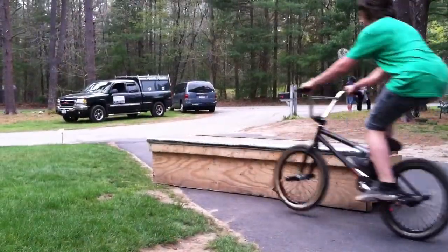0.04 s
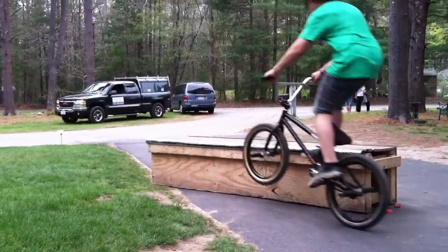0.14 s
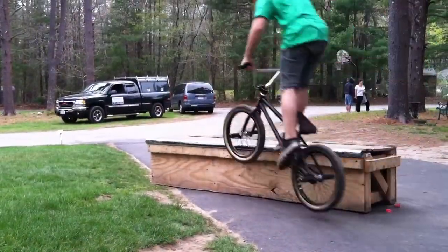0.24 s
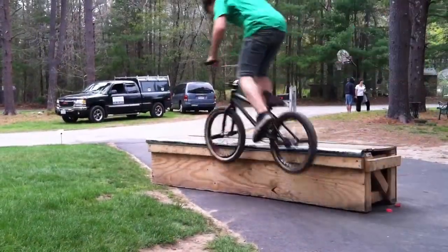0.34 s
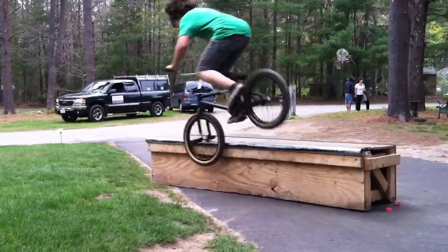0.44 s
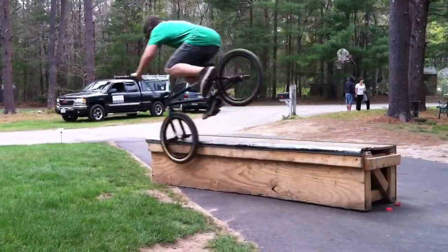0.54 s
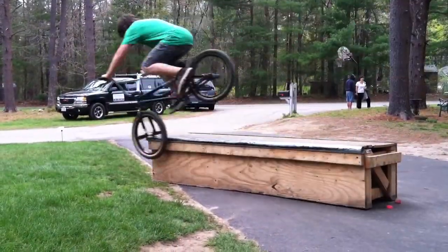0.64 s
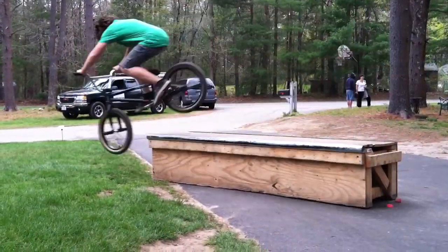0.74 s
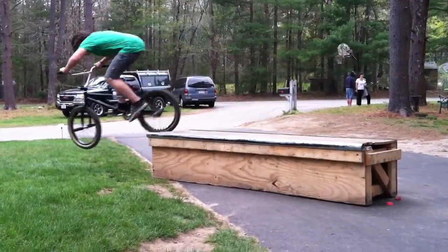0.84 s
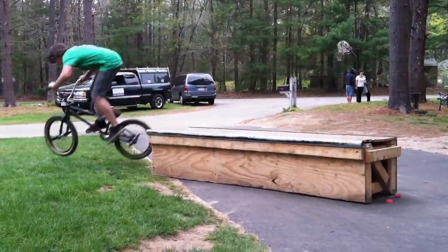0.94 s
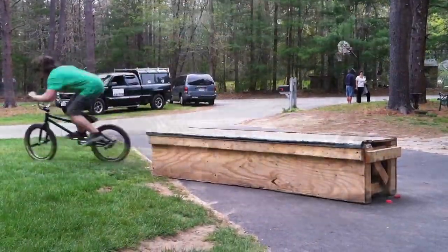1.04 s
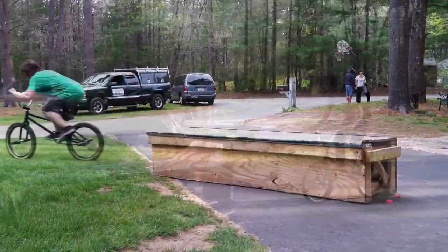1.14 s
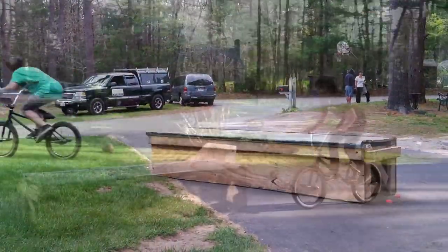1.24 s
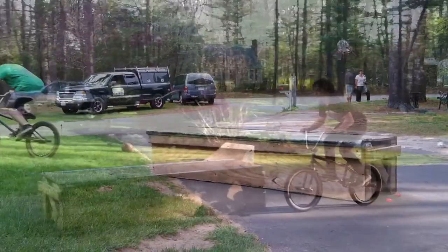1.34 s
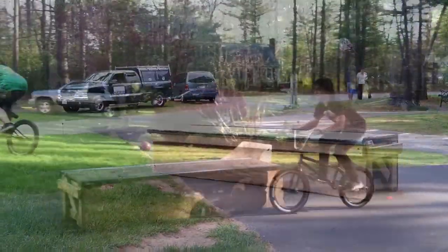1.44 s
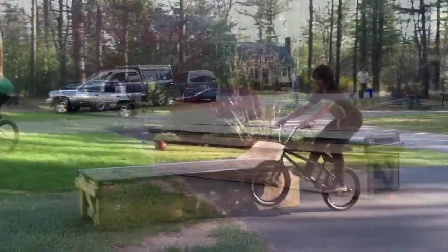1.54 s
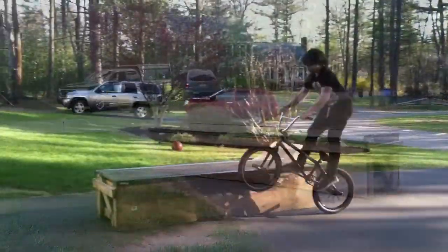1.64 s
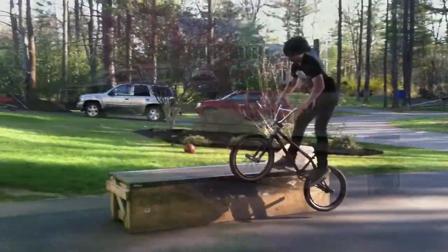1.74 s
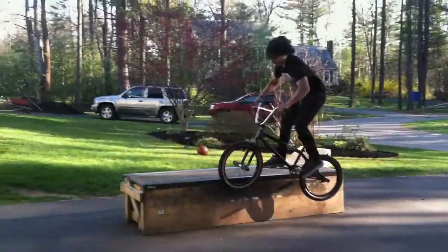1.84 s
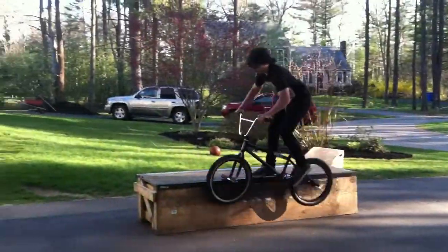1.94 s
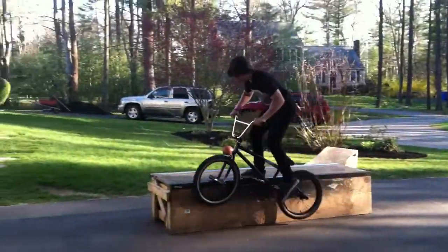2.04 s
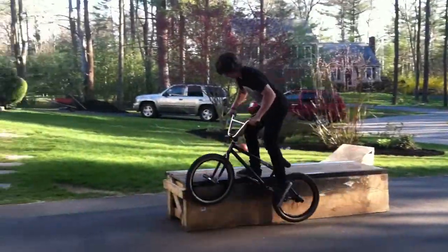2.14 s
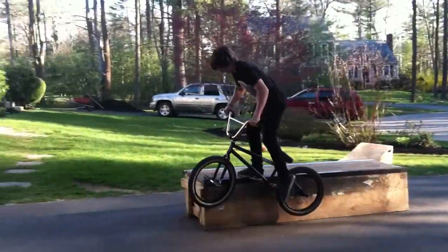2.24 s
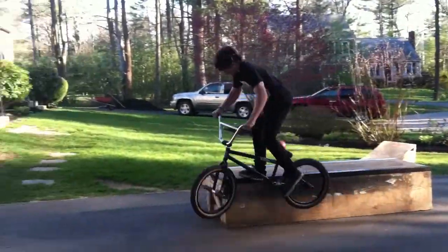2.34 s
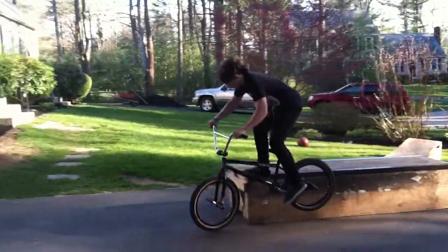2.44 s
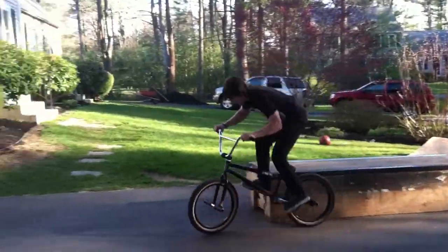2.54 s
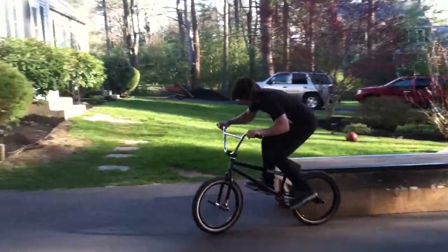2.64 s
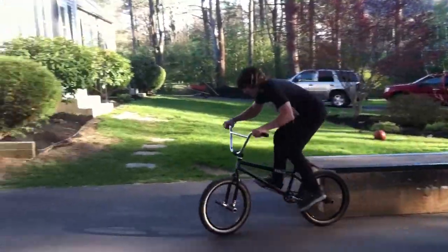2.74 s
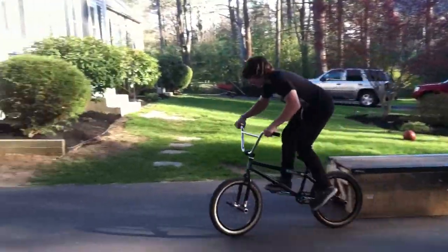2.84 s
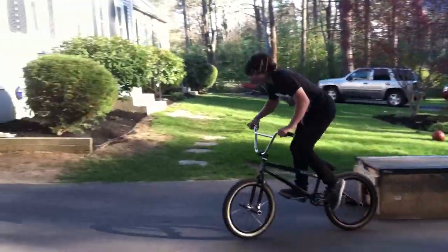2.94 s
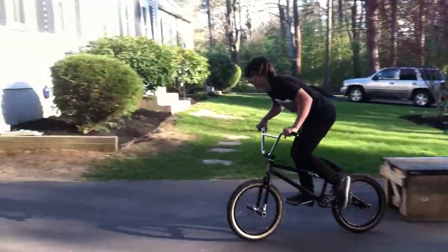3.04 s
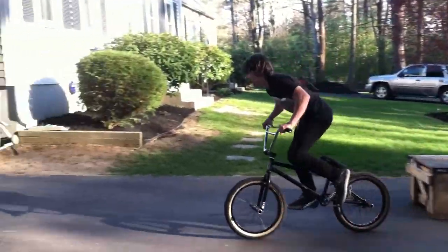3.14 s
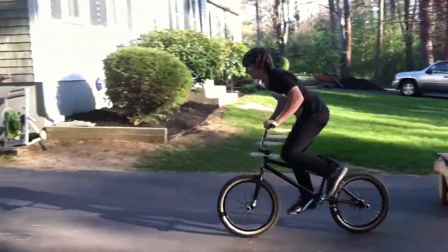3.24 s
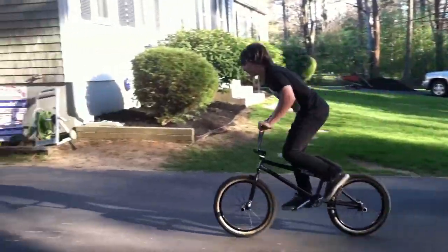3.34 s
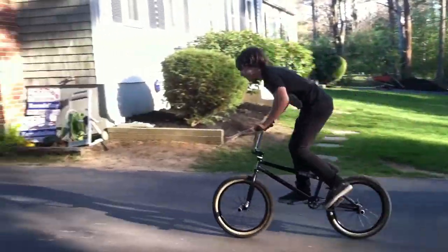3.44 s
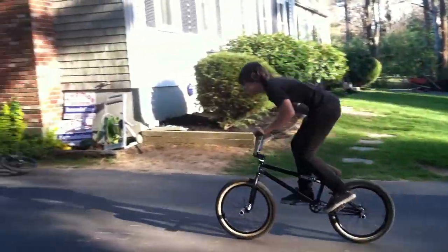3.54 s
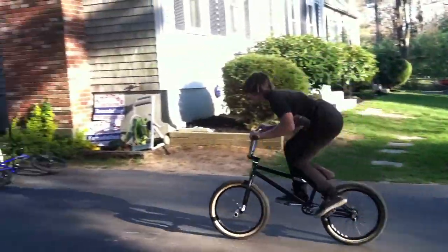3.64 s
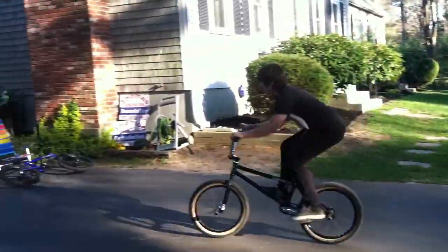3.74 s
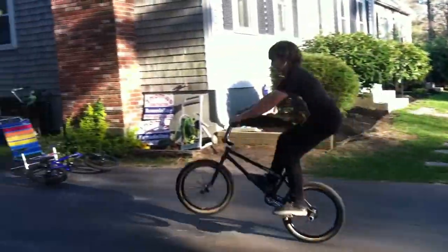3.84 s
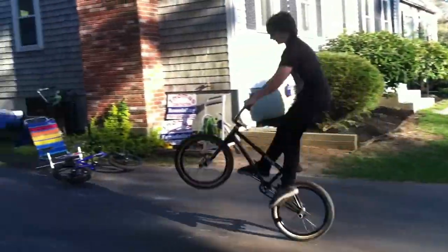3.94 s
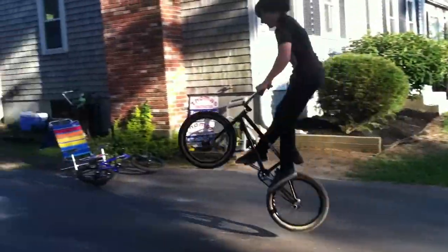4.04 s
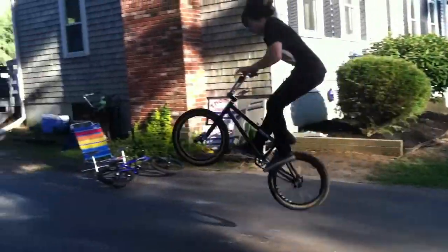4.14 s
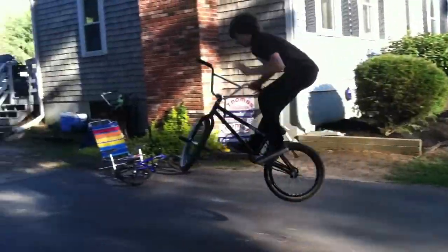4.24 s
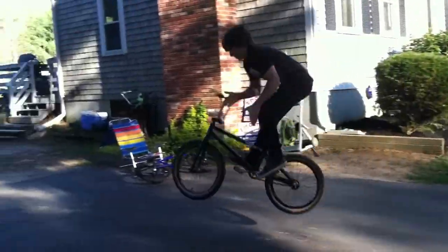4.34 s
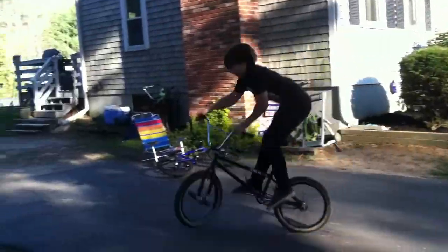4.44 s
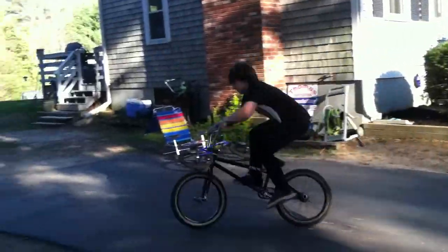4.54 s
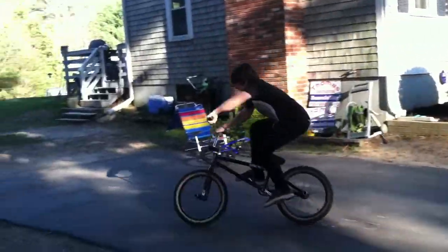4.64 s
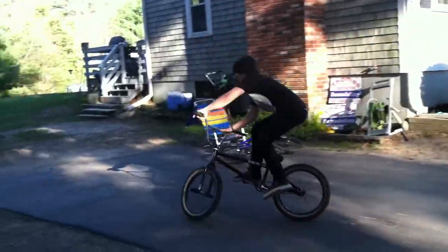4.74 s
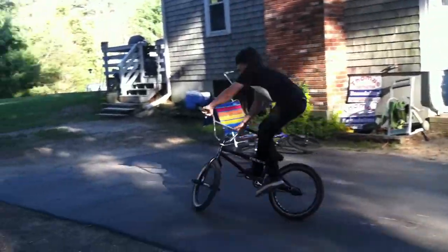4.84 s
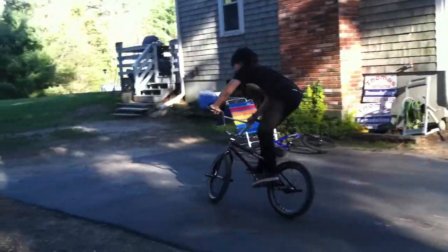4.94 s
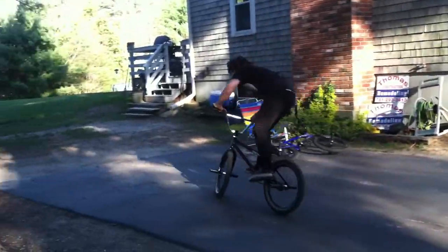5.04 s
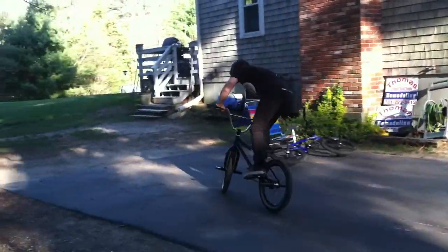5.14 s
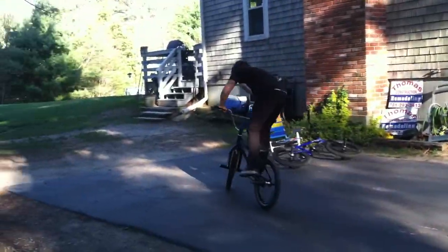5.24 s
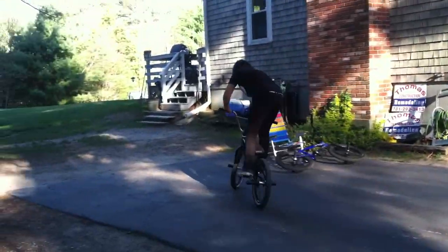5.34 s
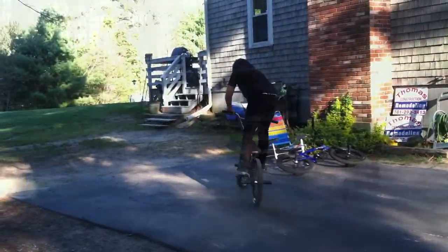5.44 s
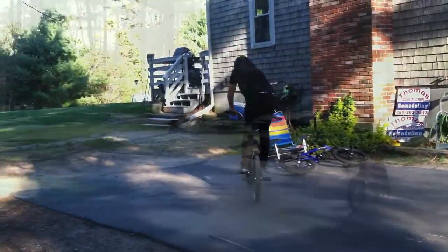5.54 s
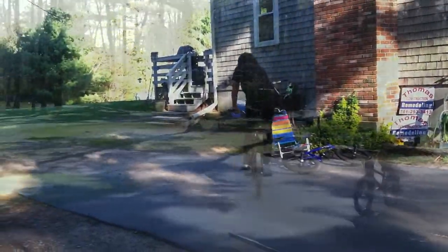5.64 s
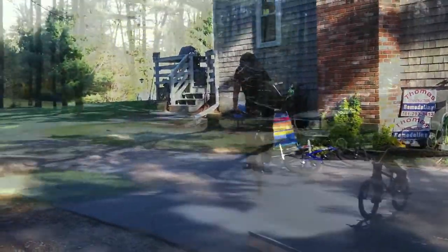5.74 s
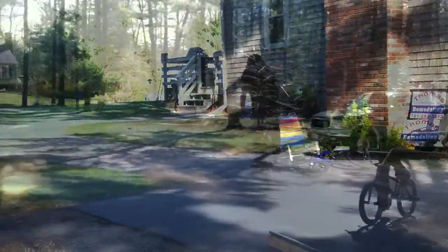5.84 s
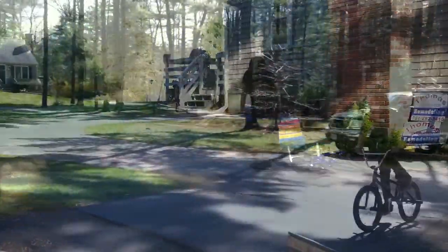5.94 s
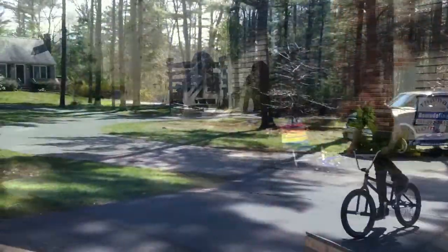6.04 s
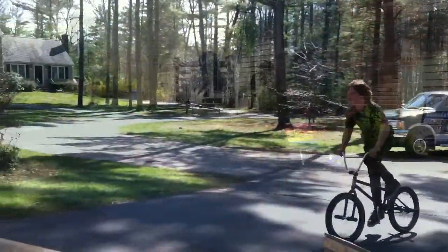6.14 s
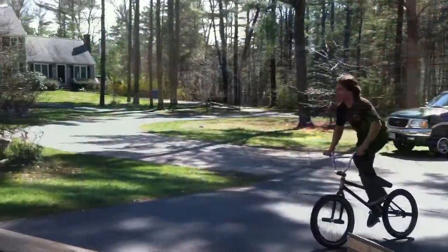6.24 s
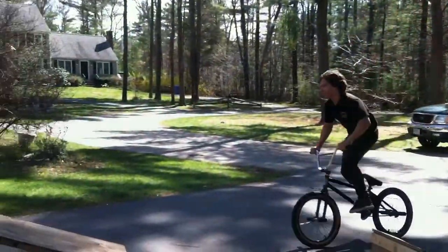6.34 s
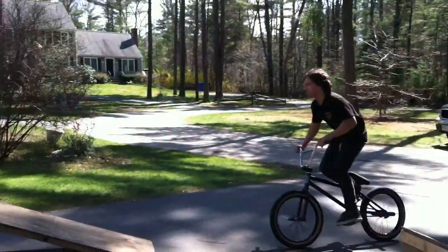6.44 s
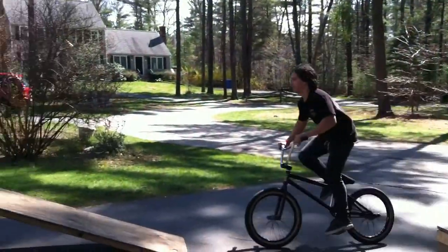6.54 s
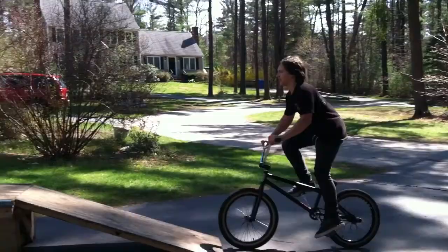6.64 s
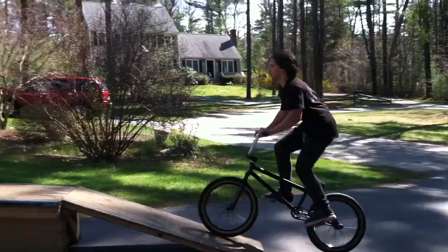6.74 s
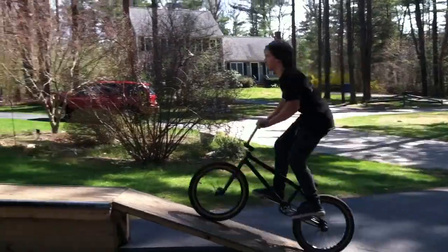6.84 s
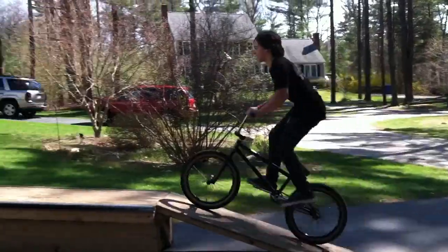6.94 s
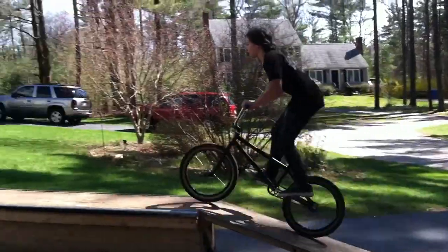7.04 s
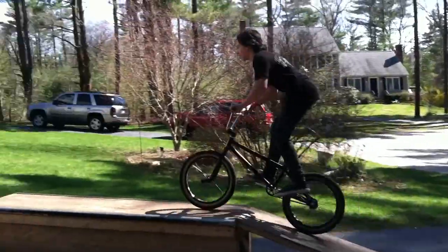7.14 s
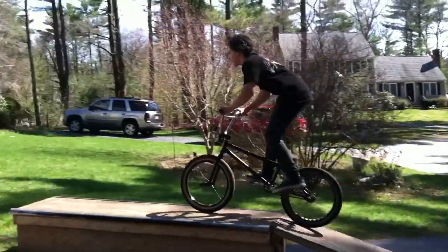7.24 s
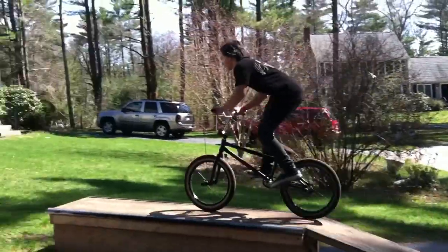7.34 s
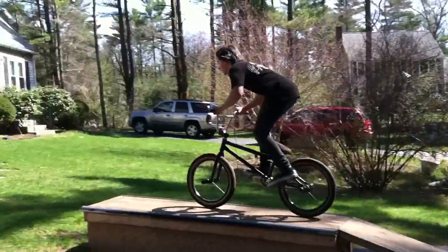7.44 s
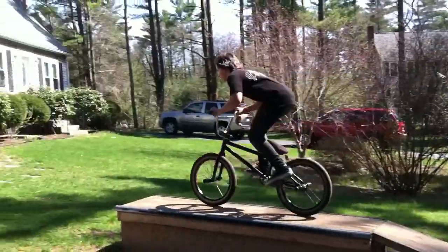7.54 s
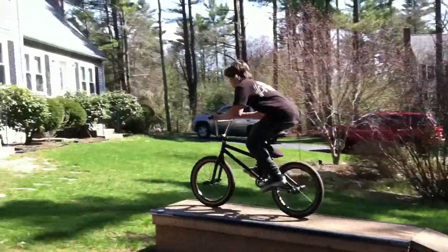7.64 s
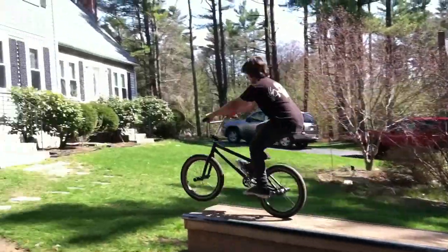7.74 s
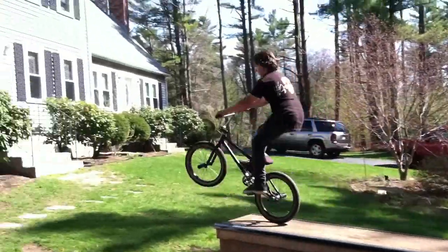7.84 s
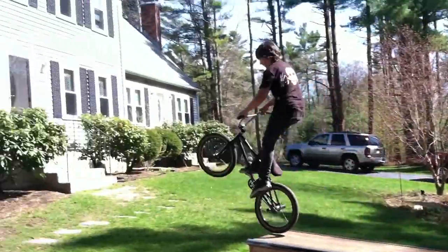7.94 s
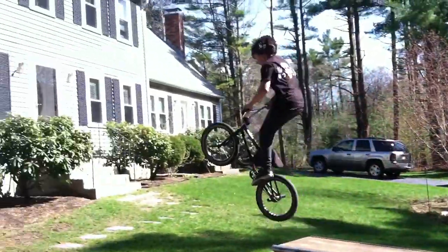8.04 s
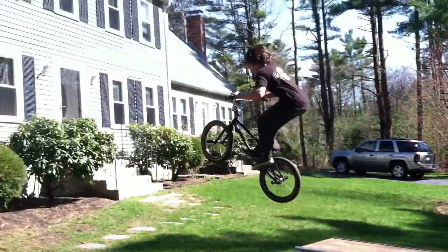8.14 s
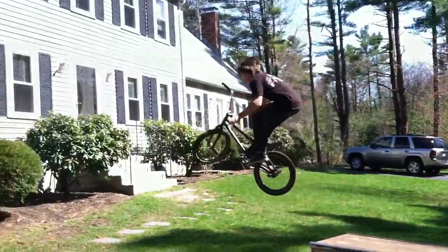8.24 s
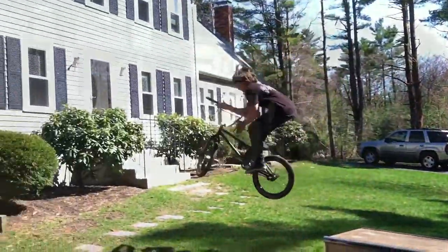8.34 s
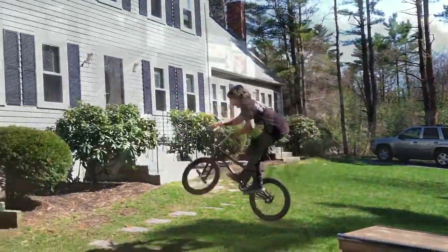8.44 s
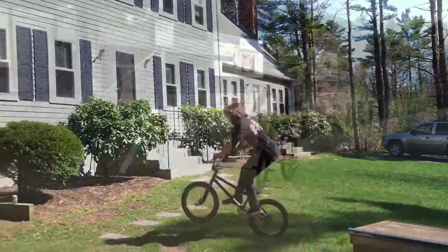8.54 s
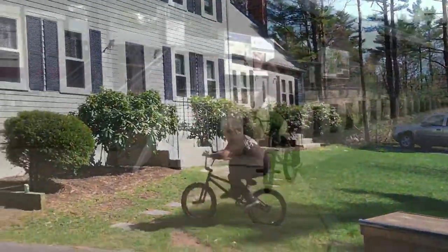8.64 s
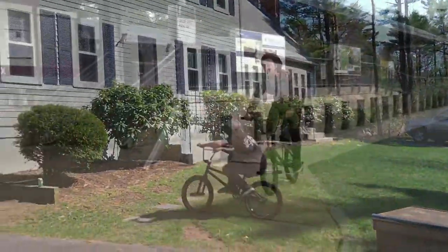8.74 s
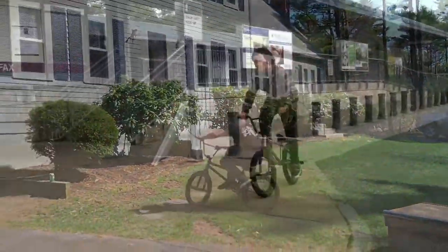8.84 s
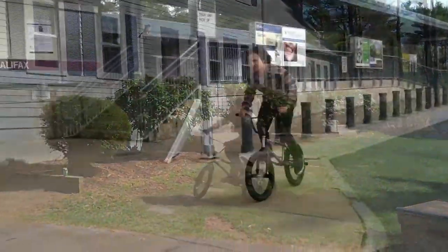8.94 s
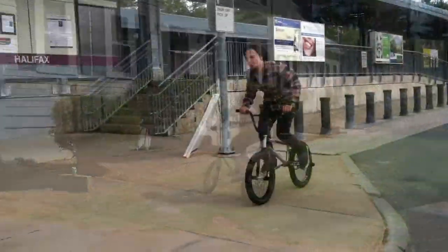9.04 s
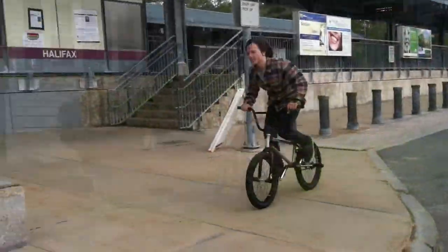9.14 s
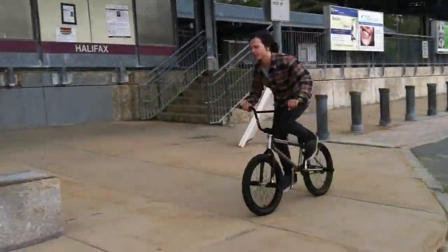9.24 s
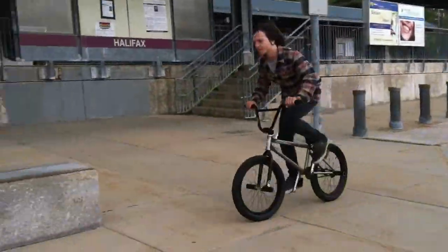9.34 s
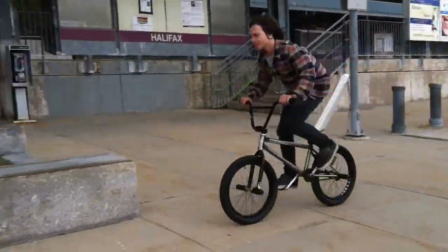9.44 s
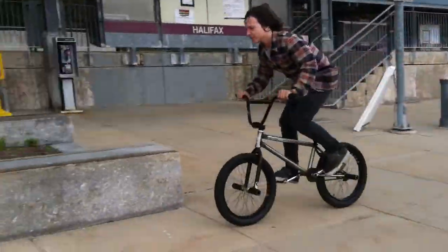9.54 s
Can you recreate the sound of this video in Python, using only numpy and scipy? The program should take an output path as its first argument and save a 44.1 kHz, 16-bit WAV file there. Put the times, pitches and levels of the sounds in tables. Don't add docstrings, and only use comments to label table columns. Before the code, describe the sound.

A phone a few metres away in a quiet yard, with soft leaves and distant traffic rumble. From 0 s a bike hub buzzes, then ticks rapidly. At 0.45-0.8 s pegs strike a hollow plywood box, hardest at 0.5, grinding with ringing tubes and spokes. Ticking fades and crossfades to another pass; at 2.06 s a sharp double slam, then scraping and lid thumps until 2.7. Sparse coasting clicks follow, with a faint falling bird whistle at 2.9 and more at 4.2, 4.9 and 5.6. Around 4.55-4.8 tyres slap tarmac with a short rubbery scrub. From 5.9 a far motor hums low; hard wooden knocks at 6.8 and 7.0 lead into rolling and bright ticking, with lighter landing knocks at 8.5-8.7. Wind puffs begin near 8.6, swelling from 9.0 into violent low buffeting and crackling flaps, peaking at 9.3 and easing by 9.5 over faint ticks.

```python
import sys
import numpy as np
from scipy import signal
from scipy.fft import rfft, irfft
from scipy.io import wavfile
from scipy.ndimage import uniform_filter1d

SR = 44100
rng = np.random.default_rng(int(sys.argv[2]) if len(sys.argv) > 2 else 0)


def inscribe(sig):
    pcm = np.round(np.clip(np.atleast_2d(sig).T, -1, 1) * 32767)
    wavfile.write(sys.argv[1], SR, pcm.astype(np.int16))


def linear_from_db(decibels):
    return 10 ** (np.asarray(decibels, float) / 20)


N = 422575


def noise():
    return rng.standard_normal(N)


def walk(rate_hz):
    hold = int(SR / rate_hz)
    steps = np.repeat(rng.standard_normal(N // hold + 1), hold)
    return 1.33 * uniform_filter1d(uniform_filter1d(steps, hold), hold)[:N]


def colour(x, points):
    hz, db = np.transpose(points)
    grid_hz = np.maximum(np.arange(2049) * SR / 4096, 1)
    outline_db = np.interp(np.log(grid_hz), np.log(hz), db, left=db[0] - 20, right=db[-1] - 70)
    cepstrum = irfft(np.log(linear_from_db(outline_db)))
    cepstrum[1:2048] *= 2
    cepstrum[2049:] = 0
    h = irfft(np.exp(rfft(cepstrum)))
    return signal.oaconvolve(x, h / np.sqrt(np.sum(h ** 2)))[:N]


def ring(x, hz, t60_s):
    r = np.exp(-np.log(1000) / t60_s / SR)
    w = 2 * np.pi * hz / SR
    return signal.lfilter([0, r * np.sin(w)], [1, -2 * r * np.cos(w), r * r], x)


def sing(x, modes):
    return sum(linear_from_db(db) * ring(x, hz, t60_s) * np.sqrt(28 / (t60_s * SR)) for hz, db, t60_s in modes)


def swell_decay(t, rise_s, fall_s):
    return (1 - np.exp(-t / rise_s)) * np.exp(-t / fall_s)


def burst(times_s, gains, rise_s, fall_s):
    spikes = np.zeros(N)
    np.add.at(spikes, np.minimum((np.asarray(times_s) * SR).astype(int), N - 1), gains)
    shape = swell_decay(np.arange(int(8 * fall_s * SR)) / SR, rise_s, fall_s)
    return np.maximum(signal.oaconvolve(spikes, shape / shape.max())[:N], 0)


def track(table):
    s, *columns = np.transpose(table)
    t = np.arange(N) / SR
    edge = np.minimum(t - s[0], s[-1] - t) / .02
    gate = np.clip(edge + (s[0] <= 0) + (s[-1] > t[-1] - .01), 0, 1)
    return np.where(t < s[0], 0, gate), [np.interp(t, s, c) for c in columns]


def swells(table, wobble):
    out, waver = np.zeros(N), 1 + wobble * walk(150)
    for start_s, length_s, hz, peak_db in table:
        i, k = int(start_s * SR), int(length_s * SR)
        phase = 2 * np.pi * hz * np.cumsum(waver[i:i + k]) / SR
        out[i:i + k] += linear_from_db(peak_db) * np.hanning(k) * np.sin(phase)
    return out


# start_s, end_s
CUTS_S = [
    (1.1, 1.6),
    (5.7, 6.0),
    (9.0, 9.3),
]


def shots():
    t = np.arange(N) / SR
    begun = [np.clip((t - a) / (b - a), 0, 1) for a, b in CUTS_S]
    return -np.diff([np.ones(N)] + begun + [np.zeros(N)], axis=0)


# freq_hz, density_db_per_hz
YARD = [(200, -29.5), (300, -11), (600, -6.5), (900, -4.5), (2500, -13.5), (3700, -30), (9000, -40),
        (12000, -38.5), (13500, -68)]
# freq_hz, density_db_per_hz
ROLL = [(18, -70.5), (30, -50), (75, -29), (114, 0), (259, -4), (292, -11), (400, -11.5), (520, -49.5),
        (880, -120)]
# time_s, level_db
ROLLING = [(6.65, -59), (7.8, -51), (8.9, -54)]


def yard(roll_db, rush_db):
    gate, (tyre_db,) = track(ROLLING)
    rumble = np.hypot(linear_from_db(roll_db), gate * linear_from_db(tyre_db))
    thrum = colour(noise(), ROLL) * rumble * linear_from_db(0.94 * walk(25))
    rush = sum(colour(noise(), YARD) * linear_from_db(rush_db - 3 + 2 * walk(rate_hz)) for rate_hz in (6, 40))
    return thrum + rush


# time_s, pitch_hz, level_db
BIRD = [
    [(2.86, 2900, -76), (2.95, 2550, -69), (3.11, 2250, -69)],
    [(4.23, 2130, -67), (4.35, 2350, -68)],
    [(4.9, 2130, -66), (5.04, 2400, -68)],
    [(5.57, 3450, -68), (5.65, 2950, -69), (5.74, 2500, -69), (5.87, 2350, -72)],
]


def bird():
    out = np.zeros(N)
    for call in BIRD:
        gate, (hz, db) = track(call)
        phase = 2 * np.pi * np.cumsum(hz * (1 + .018 * walk(400))) / SR
        out += gate * linear_from_db(db + 5.5 + 3 * walk(60)) * np.sin(phase)
    return out


# time_s, pitch_hz, level_db, octave_db
MOTOR = [(5.9, 126.6, -74, -54), (6.05, 129.4, -49.5, -69.5), (6.3, 128.5, -70, -53),
         (6.65, 127, -47.5, -56), (6.8, 125, -53, -45), (7.3, 123, -48.5, -54), (7.7, 125.9, -50.5, -53.5),
         (8.1, 122.3, -53, -53), (8.4, 123.4, -59, -59)]


def motor():
    gate, (hz, db, octave_db) = track(MOTOR)
    turn = 2 * np.pi * np.cumsum(hz) / SR
    overtones = np.sin(2 * turn) + linear_from_db(-15) * np.sin(3 * turn)
    hum = linear_from_db(db) * np.sin(turn) + linear_from_db(octave_db) * overtones
    return 0.79 * gate * linear_from_db(1.7 * walk(13)) * hum


# time_s, buffet_db
GUST = [(8.5, -50.5), (8.6, -40.5), (8.76, -42.5), (8.84, -48), (8.88, -40.5), (9.0, -32.5), (9.2, -23.5),
        (9.3, -16.5), (9.39, -20.5), (9.46, -31.5), (9.52, -30), (9.58, -32.5)]
# freq_hz, density_db_per_hz
WIND = [(15, -69), (25, -33.5), (113, -8), (157, -2.5), (291, -10), (325, -7), (700, -28), (910, -53),
        (1540, -120)]
# start_s, length_s, pitch_hz, peak_db
PUFFS = [(8.575, 0.024, 168, -28), (8.612, 0.025, 146, -26), (8.648, 0.042, 169, -29),
         (8.745, 0.021, 180, -24.5), (8.856, 0.027, 214, -22.5), (8.945, 0.033, 205, -33),
         (8.975, .022, 181, -18.5), (9.0, 0.018, 185, -21), (9.035, 0.019, 178, -14),
         (9.06, 0.031, 232, -15), (9.088, 0.03, 215, -7.5), (9.122, 0.021, 200, -18),
         (9.176, 0.023, 188, -8), (9.202, 0.028, 225, -9), (9.238, 0.036, 239, -10),
         (9.262, 0.017, 201, -8), (9.288, 0.033, 253.4, 0), (9.316, 0.024, 241, -4.5),
         (9.34, 0.024, 264, -5), (9.36, 0.017, 201, -7), (9.404, 0.033, 203.4, -3.5),
         (9.438, 0.0091, 238, -10), (9.548, 0.028, 234, -15.5)]
# time_s, peak_db
FLAPS = [(8.657, -41), (8.864, -46), (8.927, -40), (8.972, -40), (9.006, -39), (9.048, -37), (9.065, -23.5),
         (9.072, -25.5), (9.088, -30), (9.103, -22), (9.126, -25), (9.162, -30), (9.182, -19), (9.197, -23),
         (9.203, -21), (9.213, -17), (9.22, -13), (9.242, -22.5), (9.256, -12.5), (9.272, -12),
         (9.296, -1.5), (9.306, -8), (9.317, -13), (9.322, -9), (9.334, -7.5), (9.354, -5), (9.404, -27),
         (9.414, -18), (9.421, -13.5), (9.441, -23), (9.523, -42), (9.558, -37)]


def wind():
    gate, (gust_db,) = track(GUST)
    buffet = gate * linear_from_db(gust_db + 4.5 + 3.0 * walk(45))
    swing = buffet * colour(noise(), WIND) + swells(PUFFS, 0.301)
    flap_s, flap_db = np.transpose(FLAPS)
    flaps = burst(flap_s, linear_from_db(flap_db - 5.0), 0.0004, 0.0036)
    flaps = flaps + np.abs(swing) * linear_from_db(-23)
    return swing + colour(flaps * noise(), [(250, -2.5), (500, 21), (1000, 5.5), (2000, -14.5), (4000, -40.5)])


# time_s, pitch_hz, level_db
SCRUB = [
    (4.6, 377.7, -28),
    (4.75, 526, -57.5),
    (4.93, 1337, -58),
]


def scrub():
    gate, (hz, db) = track(SCRUB)
    return gate * linear_from_db(db) * walk(700) * np.sin(2 * np.pi * np.cumsum(hz) / SR)


# start_s, length_s, pitch_hz, peak_db
SWELLS = [(.595, 0.06, 169, -23), (.72, 0.049, 197, -29.5), (2.105, 0.022, 211, -14),
          (2.155, 0.028, 202, -17.5), (2.2, 0.037, 194, -25), (2.245, 0.037, 190, -20),
          (2.3, 0.066, 186, -24.5), (2.376, 0.026, 205, -16), (2.408, 0.014, 220, -24),
          (2.44, 0.02, 183, -25), (2.618, 0.022, 161, -31), (4.628, 0.034, 330, -34),
          (7.02, 0.045, 220, -22), (7.13, 0.085, 211, -40.5), (7.225, 0.039, 227, -38),
          (7.2, 0.19, 64.6, -44), (7.45, 0.12, 63, -48), (7.75, .3, 63.7, -45)]


def lid():
    return swells(SWELLS, 0.068)


# time_s, pitch_hz, level_db, t60_s
PINGS = [(.522, 2740, -41, 0.35), (0.526, 3060, -39, 0.14), (0.561, 3270, -41, .15),
         (.635, 3670, -40, 0.11), (.648, 3200, -45, 0.11), (.655, 2150, -39, 0.16),
         (.682, 804, -31.5, 0.23), (.7, 3480, -44, .12), (.705, 4330, -51, .15), (.735, 3750, -42, 0.094),
         (0.736, 1886, -38.5, 0.2), (.82, 1890, -53, 0.36), (2.098, 708, -25, 0.079),
         (2.075, 8830, -20.5, 0.023), (2.161, 1397, -21, 0.046), (2.186, 1390, -28.5, 0.058),
         (2.232, 2950, -36, 0.035), (2.245, 2950, -49, 0.19), (2.297, 1450, -43, 0.079),
         (4.567, 1520, -33, 0.03), (4.568, 3260, -32, 0.012), (4.567, 4770, -29, 0.015),
         (2.41, 1390, -43, 0.048), (2.623, 3130, -34, 0.015), (2.642, 4600, -33.5, 0.013),
         (6.81, 1850, -24, 0.05), (6.811, 1500, -20, 0.04), (6.872, 4200, -30, 0.012),
         (6.872, 3400, -33, 0.012), (6.987, 1260, -22, 0.04), (7.857, 6760, -36.5, 0.096),
         (8.494, 750, -27.5, 0.049), (8.674, 1800, -30, 0.012), (8.674, 3700, -33, 0.015),
         (8.674, 5300, -36, 0.012), (8.675, 520, -33, 0.034)]


def pings():
    out, t = np.zeros(N), np.arange(SR // 4) / SR
    for s, hz, db, t60_s in PINGS:
        decay = linear_from_db(db - 60 * t / t60_s) * (1 - np.exp(-t / 0.0013))
        out[int(s * SR):][:len(t)] += decay * np.sin(2 * np.pi * hz * t)
    return 1.53 * out * linear_from_db(4 * walk(120) + 2.57 * walk(500))


def chimes(rasp):
    out, t = np.zeros(N + SR), np.arange(SR // 10) / SR
    for when, pitch, size in rng.random((700, 3)):
        i = int(when * (N - 1))
        tone = np.sin(2 * np.pi * 700 * 5 ** pitch * t)
        out[i:i + len(t)] += rasp[i] * size * linear_from_db(-60 * t / .12) * tone
    return linear_from_db(-17) * out[:N]


# time_s, peak_db, crack_rel_db, chain_slap_rel_db, ring_time_factor
PEG_BLOWS = [
    (0.452, -15, -15, -12, 1),
    (0.51, 4, -1.5, -29, 0.66),
    (0.676, -7, -20, -45, 0.92),
    (0.785, -14.5, -14, -38, 0.86),
    (1.107, -29.5, -12, 5, 0.76),
]
LEDGE_BLOWS = [(2.01, -11.5, -17, -31, 1), (2.055, -31, -3, 10, 0.68), (2.0593, 4, 0.5, -20, 0.78),
               (2.0752, -15, -3, 5.5, 0.57), (2.082, 3.5, -16, -38, 0.54), (2.188, -21.5, 2.5, -38, 0.86),
               (2.371, -28, 0, -12, 0.71), (2.517, -22, 3, -19, 0.22), (2.64, -27, 5, -1, 0.3),
               (2.965, -50, 17.5, 13, 0.77), (4.527, -39, -12, -20, 0.4), (4.544, -36.5, 5.5, -5, 1),
               (4.554, -29, -6, 2, 0.6), (4.566, -21, 5, 3, 0.4), (4.586, -11, 3, -6, 0.53),
               (4.605, -26, 0, 3, 0.5), (5.05, -47.5, 15.5, 17, 1)]
RAMP_BLOWS = [(6.35, -41, 1.5, -16, 0.72), (6.604, -43.5, 7, 2, 0.87), (6.809, -0.5, -2, -38, 0.79),
              (6.836, -22, -12, -18, 1), (6.862, -19, -13, -25, 0.8), (6.8705, -37, 6, 10, 0.35),
              (6.962, -29, -2, -20, 0.5), (6.984, -3.5, -2, -27, 0.89), (7.179, -62, -5, -7, 0.92),
              (7.847, -31.5, -4, 11.5, 0.79), (8.488, -24, -1, -18, 0.83), (8.656, -35, 1, -10, 0.6),
              (8.674, -32, 8, 1, 0.54), (8.711, -43, 11, -5, 0.5)]
BLOWS = [PEG_BLOWS, LEDGE_BLOWS, RAMP_BLOWS]
# pitch_hz, level_db, t60_s
BODIES = [
    [(130, -40, 0.12), (171.7, 3.5, 0.16), (218, 7.5, 0.047), (283.2, -2, 0.19), (397, -18, 0.055),
     (542, -2.5, 0.2), (810, -9.5, 0.25)],
    [(133, -43, 0.89), (174, -13, 0.5), (209, 3.5, 0.16), (269, 2.5, 0.034), (486, -37, 0.085),
     (633, -14, 0.19)],
    [(146, -33, 0.23), (219, 1, 0.21), (288.3, -2, 0.24), (391, -2, 0.032), (509, -4, 0.15),
     (646, -9, 0.22), (1033, -16, 0.15), (1230, -14, 0.24), (1470, -20, 0.15)],
]
# freq_hz, density_db_per_hz
CRACKS = [
    [(350, -47), (600, 9.5), (1770, 1.5), (2020, -2.5), (3090, 1), (6000, -36.5), (7800, -82),
     (13200, -120)],
    [(350, -35), (600, -0.5), (1630, -3), (1850, -7), (2590, -8.5), (6000, -26.5), (7800, -68),
     (13200, -120)],
    [(150, -33), (350, -5), (600, 1.5), (1900, -6), (2940, -25.5), (4280, -16), (6000, -34), (7800, -33),
     (13200, -120)],
]
# start_s, end_s, drum_db, scrape_db, fade_db over the slide
SLIDES = [
    [(.46, .5, -47, -50, -13), (.56, .92, -31, -37.5, -17.5)],
    [(2.02, 2.055, -34, -59, -24), (2.1, 2.36, -28.5, -31, -10.5), (2.36, 2.52, -26, -30, -20),
     (2.52, 2.645, -43, -47, 0.5), (2.645, 2.71, -41, -40.5, -5), (3.72, 3.97, -62, -57, 1.5)],
    [(4.59, 4.665, -33, -36, -4.5), (4.665, 4.8, -43.5, -48, -11), (6.55, 6.79, -60, -55, -4),
     (7.05, 7.5, -43, -48, -8), (7.5, 8.4, -59.5, -58.5, -7)],
]
# drum_rel_db, scrape_rel_db, fall_s
SHUDDER = [
    (-13.5, -45, 0.018),
    (-22, -35.5, 0.02),
    (-17, -33, 0.036),
]
# pitch_hz, level_db, t60_s
LOOSE = [(783, -21.5, 0.026), (1463, -25, 0.41), (2200, -26.5, 0.14), (2950, -20, 0.18), (3620, -35, 0.096)]


def grind():
    drum, rattle, shaking = np.zeros(N), np.zeros(N), np.zeros(N)
    for slides, blows, shudder, body, crack in zip(SLIDES, BLOWS, SHUDDER, BODIES, CRACKS):
        shake_db, rasp_db, fall_s = shudder
        blow_s, blow_db = np.transpose(blows)[:2]
        after = burst(blow_s, linear_from_db(blow_db), 0.0051, fall_s)
        shake, rasp = linear_from_db(shake_db) * after, linear_from_db(rasp_db) * after
        for start_s, end_s, drum_db, scrape_db, fade_db in slides:
            gate, (db,) = track([(start_s, 0), (end_s - .03, fade_db), (end_s, fade_db)])
            shake = shake + gate * linear_from_db(drum_db + db)
            rasp = rasp + gate * linear_from_db(scrape_db + db)
        drum += sing(noise() * shake * linear_from_db(-7.5 + 2.75 * walk(30)), body[:4])
        shaking += rasp
        grain = linear_from_db(3 * walk(150) + 1.5 * walk(30))
        rattle += colour(noise() * rasp * grain * linear_from_db(-3.5), crack)
    drum = signal.sosfilt(signal.butter(2, 125, "high", fs=SR, output="sos"), drum)
    return drum + rattle + chimes(shaking) + linear_from_db(-3.5) * sing(rattle, LOOSE)


def knocks():
    out, slap = np.zeros(N), np.zeros(N)
    push = np.hanning(int(0.00043 * SR))
    t = np.arange(SR // 2) / SR
    for blows, body, crack in zip(BLOWS, BODIES, CRACKS):
        hz, db, t60_s = np.transpose(body)[:, :, None]
        contact = np.zeros(N)
        for s, peak_db, hard_db, slap_db, hold in blows:
            mix, detune = rng.standard_normal((2, len(body), 1))
            tilt_db = 0.17 * min(hard_db, 0) * np.log2(hz / 200.)
            decay = linear_from_db(db + 1.7 * mix + tilt_db - 60 * t / (t60_s * hold))
            modes = decay * np.sin(2 * np.pi * hz * (1 + 0.0092 * detune) * t)
            thud = np.convolve(modes.sum(axis=0), push)
            out[int((s + .0018) * SR):][:len(thud)] += linear_from_db(peak_db - 7.0) * thud / np.abs(thud).max()
            i = int((s + 0.0016) * SR)
            snap = linear_from_db(-6.0) * swell_decay(t, 0.00081, 0.0046 * hold)
            tail = linear_from_db(-23.0) * swell_decay(t, .0015, 0.045 * hold)
            contact[i:i + len(t)] += linear_from_db(peak_db + hard_db) * (snap + tail)
            slap[i:i + len(t)] += linear_from_db(peak_db + slap_db - 13.0) * swell_decay(t, 0.00098, 0.011 * hold)
        out += colour(noise() * contact, crack)
    out = signal.sosfilt(signal.butter(2, 120, "high", fs=SR, output="sos"), out)
    return out + colour(noise() * slap, [(5500, -7.5), (9000, 5.0), (12000, -10.0), (15000, -22.0)])


# pitch_hz, level_db, t60_s
HUB_BUZZ = [(2655, -2.5, 0.04), (3000, -8, 0.018), (3340, 1, .03), (3650, -3, 0.029), (4380, -7.5, 0.038)]
# time_s, level_db
BUZZ = [(0, -50), (.05, -46.5), (.16, -49), (.22, -60.5)]


def buzz():
    gate, (db,) = track(BUZZ)
    return sing(noise() * gate * linear_from_db(db + 2.3 * walk(120)), HUB_BUZZ)


# first_tick_s, last_tick_s, teeth, slowing (-1..1)
COASTS = [(.006, .197, 17, .2), (.226, .325, 3, .1), (.378, .494, 5, .1), (.54, .883, 30, .2),
          (.903, 1.188, 13, .25), (1.207, 1.643, 38, 0), (1.663, 1.774, 4, .4), (1.84, 1.985, 5, 0),
          (2.008, 2.031, 1, 0), (2.106, 2.23, 10, .3), (2.251, 2.306, 2, .35), (2.358, 2.47, 5, 0),
          (2.487, 2.516, 2, 0), (2.527, 2.581, 5, 0), (2.607, 2.655, 1, 0), (2.667, 2.676, 1, 0),
          (2.746, 2.893, 6, -.25), (3.39, 3.598, 15, -.1), (3.617, 3.75, 6, .1), (3.762, 3.921, 14, 0),
          (3.938, 4.08, 3, .6), (4.136, 4.224, 3, 0), (4.262, 4.333, 2, 0), (4.36, 4.536, 9, -.25),
          (4.61, 4.753, 10, .6), (4.899, 4.984, 3, 0), (5.142, 5.473, 11, -.22), (5.506, 5.931, 13, 0),
          (5.992, 6.081, 6, -.2), (6.092, 6.195, 8, .15), (6.212, 6.286, 3, .25), (6.354, 6.4, 1, 0),
               (6.872, 7.02, 8, -.25), (7.041, 7.089, 3, 0), (7.107, 7.199, 5, .1), (7.219, 7.488, 12, .08),
               (7.507, 7.699, 9, .15), (7.711, 7.888, 20, -.4), (7.913, 8.099, 6, .4),
               (8.12, 8.464, 22, -.4), (8.482, 8.654, 8, .3), (8.673, 8.779, 7, 0), (8.79, 9.011, 20, .05),
               (9.393, 9.577, 20, -.15)]


def ticks():
    u = np.linspace(0, 1, 200)
    spells = []
    for first_s, last_s, teeth, slowing in COASTS:
        passed = u + slowing * u * (1 - u)
        spells.append(first_s + (last_s - first_s) * np.interp(np.linspace(0, 1, teeth + 1), passed, u))
    return np.concatenate(spells)


# pitch_hz, level_db, t60_s
PAWLS = [(3089, -18.5, 0.027), (3586, -21, 0.021), (4480, -31, 0.05), (4860, -26, 0.036),
         (6531, -24, 0.025), (8104, -24, 0.018), (8810, -24.5, 0.018), (9690, -25, 0.028),
         (10530, -21, 0.018), (11460, -19, 0.019), (13000, -17.5, .02)]


def pawls(tick_s, gain):
    out, t = np.zeros(N + SR), np.arange(SR // 40) / SR
    hz, db, t60_s = np.transpose(PAWLS)[:, :, None]
    for when_s, size in zip(tick_s, gain):
        mix, detune = rng.standard_normal((2, len(PAWLS), 1))
        phase = 2 * np.pi * hz * (1 + .035 * detune) * t + 9 * mix
        modes = linear_from_db(db + 2.5 * mix - 60 * t / t60_s) * np.sin(phase)
        out[int(when_s * SR):][:len(t)] += size * (1 - np.exp(-t / 0.0013)) * modes.sum(axis=0)
    return out[:N] * linear_from_db(1.7 * walk(900))


# freq_hz, density_db_per_hz
HUBS = [
    [(1290, -1), (2200, -8), (2630, -3), (3260, -3.5), (3960, 0), (4480, -7.5), (5400, -26.5),
     (6260, -10.5), (7870, -1), (10900, -10), (15500, -30.5)],
    [(1180, -26), (2000, -14), (2310, -5), (2890, -7), (3150, -4.5), (3870, -3), (5790, -8.5), (6360, -3),
     (7550, -8.5), (8810, 0), (11900, -5.5), (15500, -34)],
    [(1350, -27), (2300, -22), (2720, -20), (3050, -13), (3540, -5), (4320, -1), (5150, -17), (6440, -7.5),
     (8940, -17), (11900, -20), (15500, -34)],
    [(1650, -41), (2800, -24), (3570, -0.5), (4660, 1), (5810, -14.5), (7960, -4.5), (13700, -14),
     (15500, -50)],
]
# time_s, tick_db
HUB_NEAR = [(0, -37.5), (.3, -37), (1.08, -49), (1.21, -59.5), (1.6, -46.5), (1.98, -37.5), (2.3, -40.5),
            (2.55, -39), (2.9, -44), (3.4, -38), (4.25, -39), (4.52, -34), (4.9, -36.5), (5.93, -50.5),
            (6.02, -42), (6.4, -44), (6.87, -33), (7.02, -32.5), (7.9, -36), (8.5, -38.5), (9.05, -50.5),
            (9.39, -41.5)]
# start_s, end_s, whirr_db
PEDALS = [
    (0, 0.14, -53),
    (2.09, 2.36, -56),
    (0.4, 0.8, -45),
    (4.5, 5.2, -60),
    (6.5, 6.84, -54.5),
]


def freewheel(share, floor_db, spin_db):
    tick_s = ticks()
    near_s, near_db = np.transpose(HUB_NEAR)
    gain = linear_from_db(np.interp(tick_s, near_s, near_db) + 1.7 * rng.standard_normal(len(tick_s)))
    snap = burst(tick_s, gain * linear_from_db(-9.5), 0.00094, 0.0032)
    hiss = burst(tick_s, gain * linear_from_db(-29.0), 0.0021, 0.021)
    speed = burst(tick_s, 1, .01, .025) / 4
    flutter = linear_from_db(2 * walk(30))
    spin = linear_from_db(floor_db) + linear_from_db(spin_db + np.interp(np.arange(N) / SR, near_s, near_db)) * speed ** 2
    for start_s, end_s, db in PEDALS:
        i, j = int(start_s * SR), int(end_s * SR)
        spin[i:j] += linear_from_db(db) * np.sqrt(np.hanning(j - i))
    whirr = colour(noise(), [(1500, -2.5), (8500, -9.0), (13000, -13.5), (16000, -22.5)])
    whirr = whirr * spin * flutter * linear_from_db(-8.0)
    drive = linear_from_db(3.0) * (noise() * (snap + hiss) + whirr)
    drive = drive + linear_from_db(13.5) * pawls(tick_s, gain) + linear_from_db(-0.5) * sing(whirr, PAWLS)
    return sum(colour(drive * np.sqrt(part), hub) for part, hub in zip(share, HUBS))


# rumble_db, leaves_road_db, whirr_floor_db, whirr_rel_db at 100 ticks a second
SHOTS = [
    (-54.5, -57, -55, -18.5),
    (-62.5, -59, -65, -7),
    (-61, -61, -61, -16),
    (-50, -52, -62, -6.5),
]


def scene():
    share = shots()
    roll_db, rush_db, floor_db, spin_db = np.transpose(SHOTS) @ share
    background = yard(roll_db, rush_db) + bird() + motor() + wind()
    bike = scrub() + lid() + pings() + grind() + knocks() + buzz() + freewheel(share, floor_db, spin_db)
    return (background + bike)[None]


def low_pass(x):
    return signal.sosfilt(signal.butter(12, 16160, fs=SR, output="sos"), x)


def record(dry):
    mix = signal.sosfilt(signal.butter(4, 90, "high", fs=SR, output="sos"), dry)
    mix = mix / (1 + np.abs(mix) ** 4) ** (1 / 4)
    mix = mix + linear_from_db(-73.5) * colour(noise(), [(15, -6.5), (30, -13.5), (75, -15.5), (100, 0.5)])
    return low_pass(np.clip(mix, -.99, .99))


dry = scene()
out = record(dry)
inscribe(out)
```